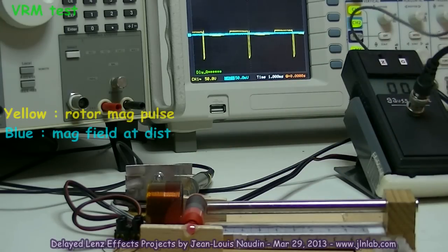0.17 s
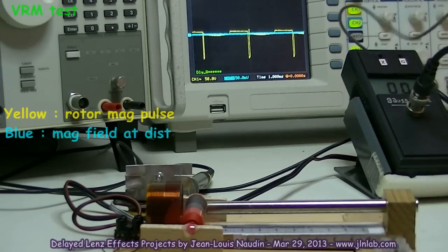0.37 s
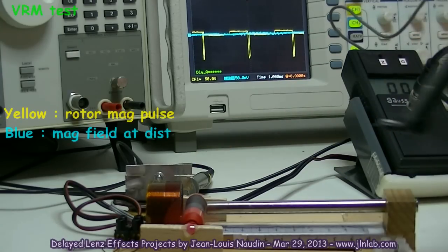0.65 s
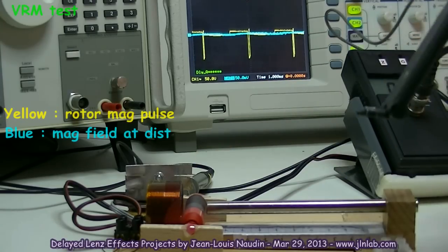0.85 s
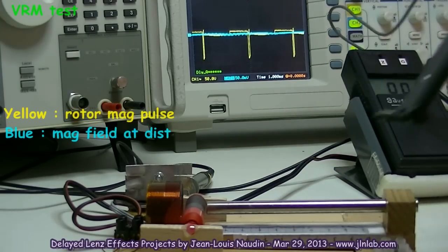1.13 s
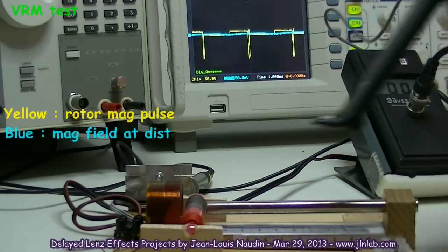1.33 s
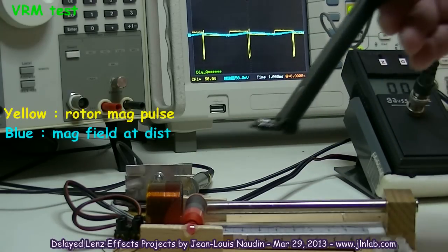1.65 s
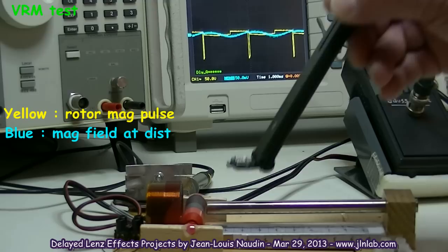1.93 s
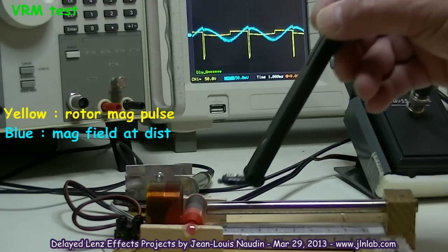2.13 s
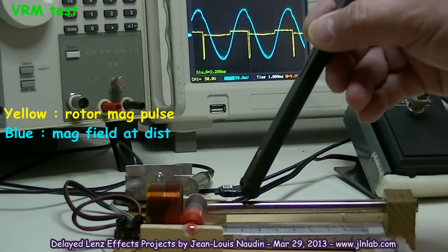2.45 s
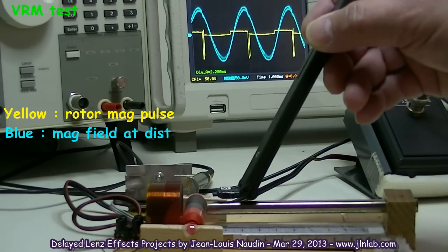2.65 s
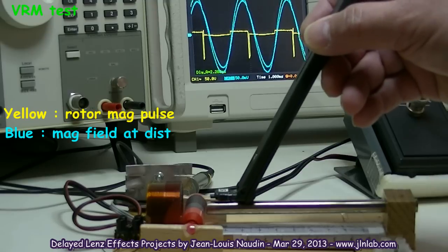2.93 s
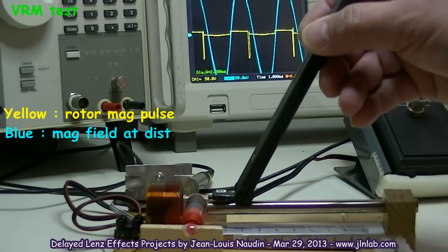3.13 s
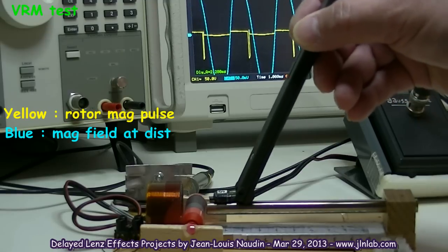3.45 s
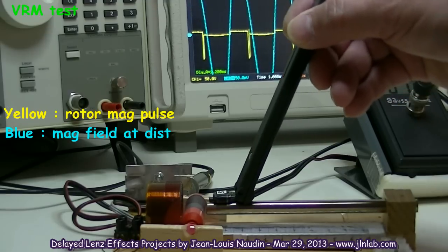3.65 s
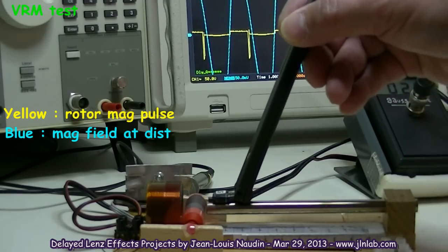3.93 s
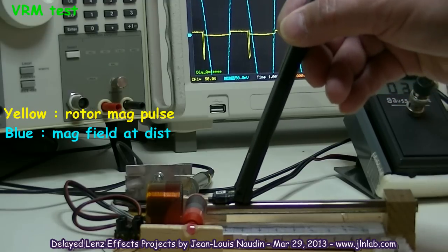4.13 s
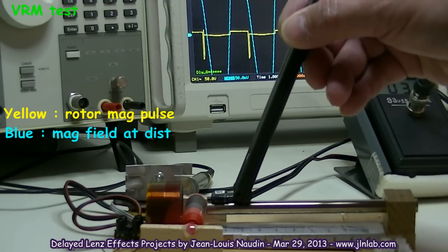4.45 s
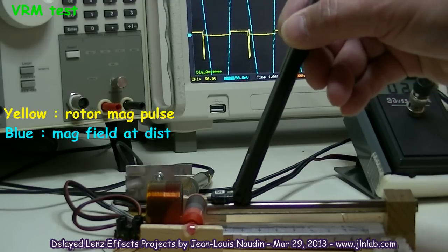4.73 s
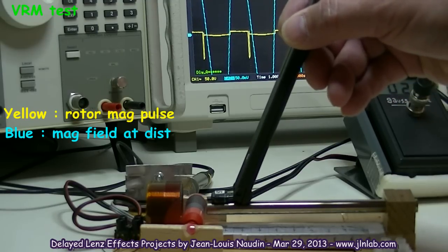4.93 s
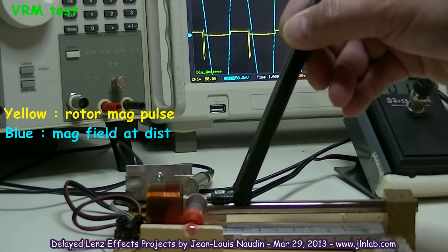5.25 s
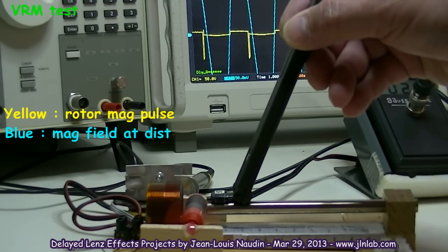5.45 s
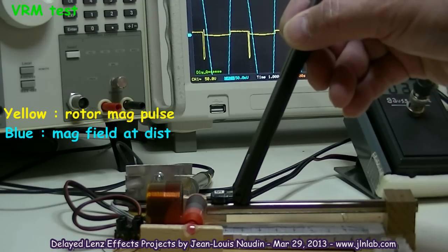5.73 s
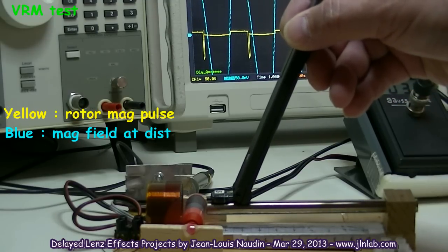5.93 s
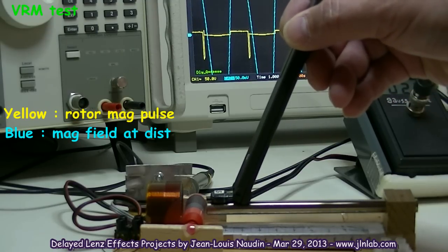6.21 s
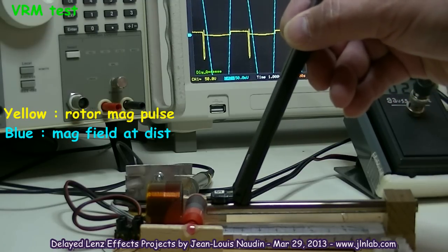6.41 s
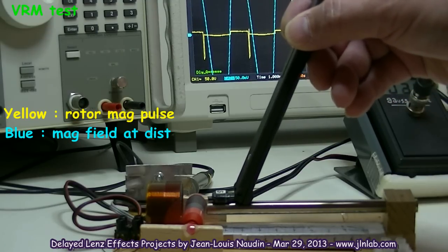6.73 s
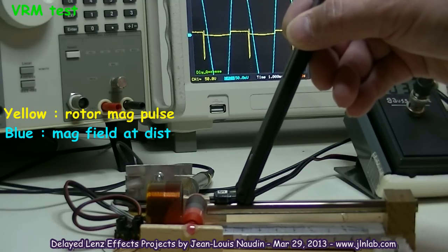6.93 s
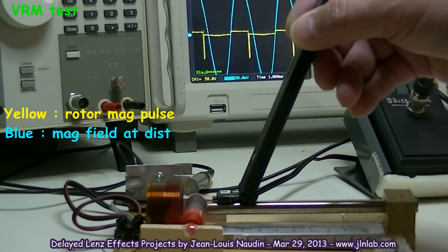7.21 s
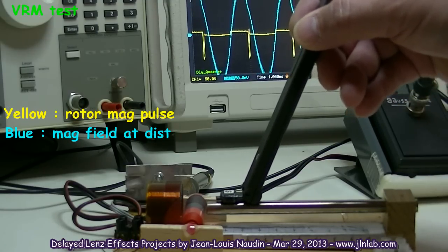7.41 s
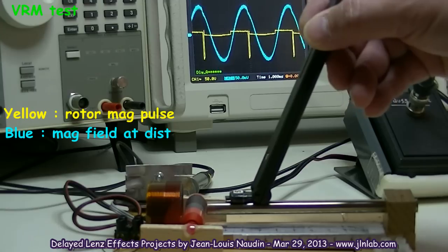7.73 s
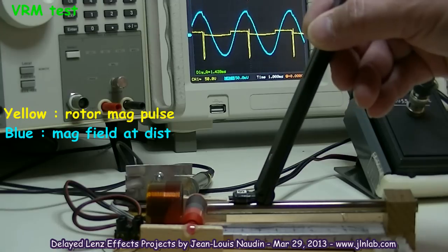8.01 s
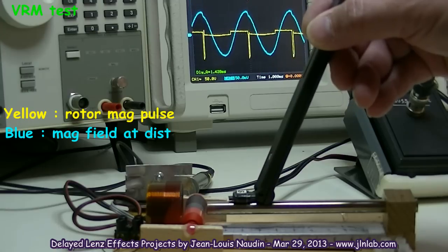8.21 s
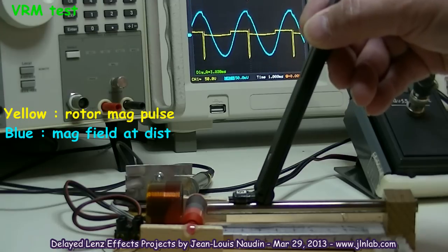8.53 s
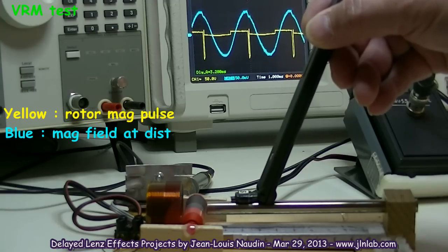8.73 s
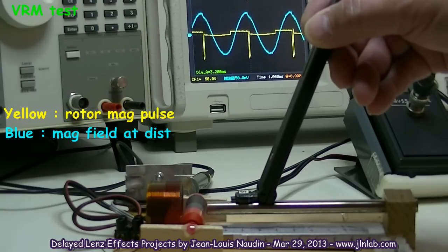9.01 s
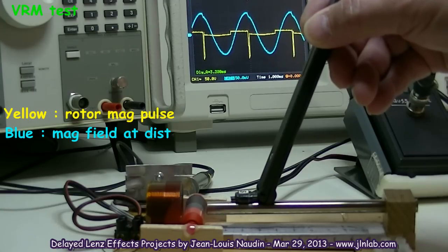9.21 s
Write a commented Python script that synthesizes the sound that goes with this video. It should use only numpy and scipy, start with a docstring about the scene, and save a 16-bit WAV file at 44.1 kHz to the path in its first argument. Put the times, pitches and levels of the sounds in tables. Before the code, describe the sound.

A tiny spinning rotor on a workbench gives a continuous, reedy, metallic whine, rich in overtones, with fine bearing hiss around it. Near three seconds a hand-held probe lands on the metal rail with short buzzing, scratchy chatters. The whine then goes on unbroken, slightly changed in colour and a hair higher. Close, dry microphone, almost centred, with the sound narrow.

```python
"""Magnet rotor whining on a wooden rail

A small magnet rotor, kicked by a coil, knocks its axle every turn; the rail rings at multiples of the
turn rate (harmonic synthesis) over bearing hiss (filtered noise) and a faint mains hum (a sine).
A hand-held probe chatters on the rail (random taps through resonances), then rests there and changes
how it rings. Two close microphone ports of a camera hear it with small level and phase differences."""
import sys
import numpy as np
from scipy import signal
from scipy.fft import rfft, irfft
from scipy.io import wavfile
from scipy.ndimage import uniform_filter1d

SR = 44100
rng = np.random.default_rng(int(sys.argv[2]) if len(sys.argv) > 2 else 0)


def bounce(signal):
    """Save signal as a 16-bit WAV file at the path given by the first command-line argument."""
    frames = np.transpose(np.atleast_2d(signal))
    limited = np.clip(frames, -1, 1)
    pcm = np.round(limited * 32767).astype(np.int16)
    wavfile.write(sys.argv[1], SR, pcm)


N = 412776  # samples
STEP = 32  # samples between updates of slow controls


# Mean rotor speed, creeping up with sags, and a jump as the axle settles: time_s, turn_rate_hz
ROTOR_SPEED = [(0, 207.2), (.35, 207.05), (1.05, 207.2), (1.3, 207.45), (1.8, 207.35), (2, 207.75),
               (2.5, 207.75), (2.7, 207.5), (4.4, 207.65), (4.7, 207.5), (5.05, 207.9), (5.45, 207.5),
               (5.7, 208.3), (6.3, 208.15), (6.5, 208.65), (7, 208.45), (9.36, 208.5)]


def rotor_turns(t):
    """Phase as the integral of frequency: turns counted from a speed that hunts about its mean."""
    hunt_rate_hz, hunt_width_hz, hunt_rms_hz = 2.6, 2, .11
    hunt = level(resonance(rng.standard_normal(N), hunt_rate_hz, hunt_width_hz), 0)
    tremble_hz = 0.0806 * random_walk(14)
    speed_hz = over_time(ROTOR_SPEED, t) + hunt_rms_hz * hunt + tremble_hz
    knock_jitter_turns = 0.0019 * random_walk(60)  # each knock lands a little early or late
    return np.cumsum(speed_hz) / SR + knock_jitter_turns


# Harmonic spectra of the rail with the probe away, with the probe near, and with the axle settled:
# multiple (of the turn rate), relative_level_db
RING_PROBE_AWAY = [(1, -29), (2, -17), (3, -13), (4, -6), (5, -11), (6, -8), (7, -2), (8, -9), (9, -16),
                   (10, -17), (11, -10), (12, -9), (13, -14), (14, -10), (15, -11), (16, -10), (17, 0),
                   (18, -8), (19, -8), (20, -5), (21, -17), (22, -18), (23, -15), (24, -12), (25, -12),
                   (26, -15), (27, -21), (28, -23), (29, -22), (30, -21), (31, -28), (32, -27), (33, -26),
                   (34, -29), (35, -30), (36, -30), (37, -26), (38, -25), (39, -29), (40, -27), (41, -28),
                   (42, -32), (43, -33), (44, -31), (45, -31), (46, -29), (47, -33), (48, -34), (49, -34),
                   (50, -34), (51, -34), (52, -34), (53, -36), (54, -38), (55, -37), (56, -39), (57, -39),
                   (58, -38), (59, -40), (60, -41)]
RING_PROBE_NEAR = [(1, -32), (2, -20), (3, -18), (4, -3), (5, -14), (6, -7), (7, -4), (8, -12), (9, -18),
                   (10, -15), (11, -14), (12, -9), (13, -9), (14, -11), (15, -10), (16, -8), (17, 0),
                   (18, -4), (19, -7), (20, -8), (21, -17), (22, -11), (23, -5), (24, -17), (25, -18),
                   (26, -15), (27, -21), (28, -21), (29, -24), (30, -25), (31, -26), (32, -29), (33, -30),
                   (34, -30), (35, -31), (36, -31), (37, -33), (38, -26), (39, -29), (40, -26), (41, -30),
                   (42, -35), (43, -32), (44, -28), (45, -27), (46, -32), (47, -31), (48, -33), (49, -31),
                   (50, -34), (51, -33), (52, -35), (53, -38), (54, -38), (55, -36), (56, -39), (57, -40),
                   (58, -35), (59, -36), (60, -37)]
RING_AXLE_SETTLED = [(1, -31), (2, -17), (3, -15), (4, -3), (5, -11), (6, -6), (7, 0), (8, -11), (9, -17),
                     (10, -14), (11, -18), (12, -8), (13, -12), (14, -6), (15, -4), (16, -1), (17, 0),
                     (18, -2), (19, -5), (20, -6), (21, -15), (22, -6), (23, -9), (24, -17), (25, -20),
                     (26, -18), (27, -18), (28, -19), (29, -24), (30, -25), (31, -28), (32, -29), (33, -28),
                     (34, -24), (35, -24), (36, -28), (37, -28), (38, -25), (39, -25), (40, -23), (41, -24),
                     (42, -32), (43, -30), (44, -24), (45, -23), (46, -25), (47, -30), (48, -30), (49, -31),
                     (50, -34), (51, -30), (52, -32), (53, -34), (54, -35), (55, -36), (56, -38), (57, -39),
                     (58, -35), (59, -35), (60, -37)]
# Level of a 0 dB line in each of these three spectra, in the same order: level_db
RING_LEVELS = [-48, -48, -49.5]


def rail_whine(turns, stage, changes_db):
    """Fourier synthesis: one line per multiple of the turn rate, its level and phase following the stage."""
    drift_db, flutter_db, sway_rad = .5, .9, .11  # as they stand at the 16th multiple
    patterns = RING_PROBE_AWAY, RING_PROBE_NEAR, RING_AXLE_SETTLED
    levels_db = np.array([np.transpose(p)[1] + db for p, db in zip(patterns, RING_LEVELS)])
    multiples = np.arange(1, levels_db.shape[1] + 1)

    # bending waves bring the low multiples at other moments; bench echoes scatter each arrival
    dispersion = 1.8 * (1 - np.exp(-multiples / 6))
    scatter = (.08 + .003 * multiples) * rng.standard_normal(len(multiples))
    late_turns = dispersion + scatter
    phases = np.array([ring_phase(p) for p in patterns]) - 2 * np.pi * np.cumsum(late_turns)

    slow = np.arange(0, N, STEP)
    slow_stage = stage[slow]
    drift, flutter = random_walk(2.516)[slow], random_walk(40)[slow]
    first_line = np.exp(2j * np.pi * turns)
    line, out = 1, np.zeros(N)
    for k in multiples:
        line = line * first_line
        shift = rng.integers(len(slow))  # each line takes another stretch of the same wavering
        waver_db = drift_db * np.roll(drift, shift) + flutter_db * np.roll(flutter, shift)
        db = np.interp(slow_stage, range(3), levels_db[:, k - 1])
        if k in changes_db:
            db = db + changes_db[k][slow]
        db = db + waver_db * (k / 16) ** 0.52
        db = db - .1 * max(k - 46, 0)  # the highest lines sink into the hiss
        phase = np.interp(slow_stage, range(3), phases[:, k - 1])
        phase = phase + sway_rad * np.roll(flutter, -shift) * np.sqrt(k / 16)
        envelope = np.interp(np.arange(N), slow, undb(db) * np.exp(1j * phase))
        out += (envelope * line).real
    return out * np.sqrt(2)  # peak amplitude from rms level


def ring_phase(orders):
    """Minimum phase, from the causal half of the cepstrum: all multiples start at one knock and ring on."""
    log_gain = np.log(undb([orders[0][1]] + [db for _, db in orders]))
    cepstrum = irfft(log_gain)
    half = len(cepstrum) // 2
    cepstrum[1:half] *= 2
    cepstrum[half + 1:] = 0
    return rfft(cepstrum).imag[1:]


# Course of the rail's ring: time_s, stage (0 probe away, 1 probe near, 2 axle settled; no unit)
RING_STAGE = [(1.3, 0), (1.8, 0.031), (2.2, 0.69), (5.35, 1.1), (5.55, 1.5), (6.1, 1.1), (6.4, 1.84),
              (7, 1.9), (7.4, 1.53), (7.8, 2.05)]


def rail_stage(t):
    """Changing boundary conditions, reduced to one position between the three ring spectra."""
    return over_time(RING_STAGE, t)


# Second multiple against its stage: time_s, change_db
SECOND_MULTIPLE = [(0, 2.5), (.9, 1.5), (1.8, -6.5), (2.2, -6), (3.05, -5), (3.1, 1), (3.5, 2.5),
                   (3.55, -9), (4.2, -3.5), (4.3, 1), (7.4, 2), (7.85, -4), (8.1, 0.5), (8.7, -1),
                   (9.36, 3)]
# Spells of the probe resting firmly on the rail: start_s, end_s
PRESSED_SPELLS = [(3.09, 3.27), (3.49, 9.36)]


def low_multiple_changes(t, stage):
    """Modal loading: level changes (dB) of multiples 2 to 4 as the probe nears and presses on the rail."""
    press_s = 0.015  # time to take up or release the pressure
    pressed = sum(np.interp(t, [start - press_s, start, end, end + press_s], [0, 1, 1, 0])
                  for start, end in PRESSED_SPELLS)
    third = 6 - 12 * pressed
    third = third + np.interp(t, [0, 3.7], [-7.5, 0])  # starts weaker and grows
    third = third + np.interp(t, [4.04, 4.3], [0, 8])  # comes back under steady pressure
    fourth = -3 + 3.5 * pressed
    fourth = fourth + 4 * np.clip(1 - stage, 0, 1)  # stronger while the probe is away
    return {2: over_time(SECOND_MULTIPLE, t), 3: third, 4: fourth}


# Touches of the probe; buzz is relative to the rail's sound in the buzz band:
# start_s, length_s, body_level_db, scratch_level_db, buzz_level_db
PROBE_TOUCHES = [(2.87, 0.01, -54, -46, 0), (2.887, 0.058, -50, -45, 3), (3.05, 0.015, -54, -52, -3),
                 (3.284, 0.056, -54, -48, 2)]
# Resonances of the probe's body (width of each of two passes): pitch_hz, width_hz, relative_level_db
BODY_MODES = [(466, 160, -24), (640, 70, -10), (810, 76, -7.5), (1414, 49, -5), (1620, 96, -5.5)]
# Resonances of the tip on metal (width of each of two passes): pitch_hz, width_hz, relative_level_db
TIP_MODES = [(3270, 1300, 4), (4280, 2300, -7)]


def probe_chatter(t, rail):
    """Impulsive excitation of resonators: uneven taps ring body and tip, and the rail makes the probe buzz."""
    taps_per_s, spread_db = 1100, 3
    struck = rng.random(N) < taps_per_s / SR
    strength = undb(spread_db * rng.standard_normal(N))
    taps = struck * strength * rng.choice([-1, 1], N)
    body, tip = ring_modes(taps, BODY_MODES), ring_modes(taps, TIP_MODES)
    buzz = resonance(rail, 1430, 250)
    out = np.zeros(N)
    for start, length, body_db, tip_db, buzz_db in PROBE_TOUCHES:
        end = start + length
        contact = np.interp(t, [start - .003, start, end, end + 0.0072], [0, 1, 1, 0])
        first_slip = np.exp(-np.clip(t - start, 0, 1) / 0.1)  # the scratch is hardest as the tip lands
        scratch = undb(tip_db) * tip * first_slip
        out += contact * (undb(body_db) * body + scratch + undb(buzz_db) * buzz)
    return out


def ring_modes(x, modes):
    """Modal superposition: one excitation rings every mode, and the sum has unit rms."""
    return level(sum(level(resonance(x, hz, width), db) for hz, width, db in modes), 0)


# Spectrum of bearing and air hiss between the lines: frequency_hz, relative_density_db (per Hz)
HISS_COLOUR = [(30, -40), (90, -38), (160, -27.5), (300, -20.5), (550, -10.5), (1000, -8), (1900, -5.5),
               (3000, -2), (4000, 1), (5200, -7.5), (7300, -19.5), (9200, -17), (12000, -24.5),
               (15600, -31)]
# Valleys in that spectrum (Gaussian, width of two standard deviations): pitch_hz, width_hz, depth_db
HISS_VALLEYS = [(1567, 44, -6.5), (2290, 100, -3.5), (2444, 33, -4), (3450, 29, -1.5), (3610, 60, -6),
                (3854, 140, -8.5), (5060, 68, -4)]
# Hiss the two ports do not share, relative to the hiss spectrum: frequency_hz, level_db
UNSHARED_HISS = [(30, -10), (250, -12), (800, -18), (3000, -17), (8000, -8.5), (11000, -16.5), (15000, -42)]


def bearing_hiss(turns):
    """Filtered noise, amplitude-modulated in the treble once a turn; returns shared and unshared parts."""
    mean_db, swell_depth, treble_corner_hz = -50, .22, 2000
    ripple_db, ripple_width_hz = 1.7, 45  # bench echoes make the colour uneven (rms, smoothing width)
    bins_hz = np.arange(N // 2 + 1) * SR / N
    valleys_db = sum(db * np.exp(-2 * ((bins_hz - hz) / width) ** 2) for hz, width, db in HISS_VALLEYS)
    size = int(ripple_width_hz * N / SR)
    ripple = uniform_filter1d(uniform_filter1d(rng.standard_normal(len(bins_hz)), size), size)
    colour = undb(over_hz(HISS_COLOUR) + valleys_db + ripple_db * level(ripple, 0))

    treble = 1 / (1 + (treble_corner_hz / (bins_hz + 1)) ** 4)
    swell = 1 + swell_depth * np.cos(2 * np.pi * (turns - .85))
    white, other_white = rng.standard_normal((2, N))
    steady_part = rfft(white) * (1 - treble)
    swelling_part = rfft(white * swell) * treble
    shared = irfft(colour * (steady_part + swelling_part), N)
    unshared = irfft(colour * undb(over_hz(UNSHARED_HISS)) * rfft(other_white), N)
    gain = undb(mean_db + 0.17 * random_walk(3.1)) / np.sqrt(np.mean(shared ** 2))
    return shared * gain, unshared * gain


def mains_hum(t):
    """Pure tone: a faint sine at 100 Hz, peak level in dB."""
    return undb(-102.5) * np.sin(2 * np.pi * 100 * t)


# Level difference of the microphone ports: frequency_hz, left_minus_right_db
PORT_BALANCE = [(200, -.2), (620, -.7), (800, 0), (1500, .2), (2300, -.1), (3300, -1.4), (4200, -.1),
                (5200, .4), (6300, 1.4), (7500, .4), (8300, 1.3), (11000, 0)]
# Phase difference of the microphone ports: frequency_hz, left_lead_rad
PORT_LEAD = [(200, .14), (500, 0.045), (1500, 0.0086), (2500, 0.19), (3500, 0.16), (4500, 0.12),
             (5500, .048), (6800, 0.021), (15000, 0)]


def two_ports(bench, unshared):
    """Interchannel level and phase differences, half on each port, with unshared hiss in opposite signs."""
    port = undb(over_hz(PORT_BALANCE) / 2) * np.exp(.5j * over_hz(PORT_LEAD))
    spectrum = rfft(bench)
    left = irfft(spectrum * port, N) + unshared
    right = irfft(spectrum / port, N) - unshared
    return np.array([left, right])


def resonance(x, hz, width):
    """Second-order resonator applied twice, for steeper skirts."""
    b, a = signal.iirpeak(hz, hz / width, fs=SR)
    return signal.lfilter(b, a, signal.lfilter(b, a, x))


def random_walk(rate):
    """Band-limited random control: levels held 1 / rate s, smoothed twice; spread near 1."""
    hold = int(SR / rate)
    steps = np.repeat(rng.standard_normal(N // hold + 1), hold)
    return np.sqrt(2) * uniform_filter1d(uniform_filter1d(steps, hold), hold)[:N]


def over_time(table, t):
    """Linear interpolation of a (time, value) table."""
    return np.interp(t, *np.transpose(table))


def over_hz(table):
    """Interpolation on a logarithmic frequency axis: a (Hz, value) table at every bin of the spectrum."""
    hz, value = np.transpose(table)
    return np.interp(np.log(np.arange(N // 2 + 1) * SR / N + 1), np.log(hz), value)


def undb(db):
    """Decibel law: amplitude gain of a level in dB."""
    return 10 ** (np.asarray(db) / 20)


def level(x, db):
    """Normalization by effective value: scale to an rms level in dB."""
    return x * undb(db) / np.sqrt(np.mean(x ** 2))


def scene():
    """Superposition of whine, probe, hiss and hum at the bench, heard at two close ports."""
    t = np.arange(N) / SR
    turns = rotor_turns(t)
    stage = rail_stage(t)
    rail = rail_whine(turns, stage, low_multiple_changes(t, stage))
    shared, unshared = bearing_hiss(turns)
    bench = rail + probe_chatter(t, rail) + shared + mains_hum(t)
    return two_ports(bench, unshared)


def record(dry):
    """Band limiting: the camera cuts the top with a steep elliptic low-pass at 15560 Hz."""
    return signal.sosfilt(signal.ellip(10, .2, 60, 15560, fs=SR, output="sos"), dry)


dry = scene()
out = record(dry)
bounce(out)
```